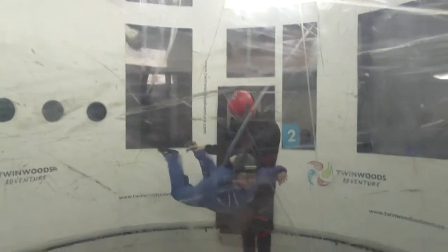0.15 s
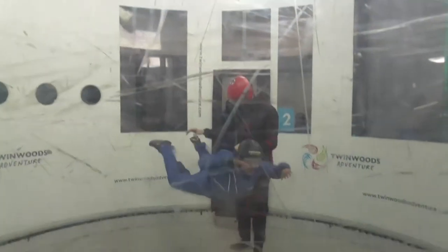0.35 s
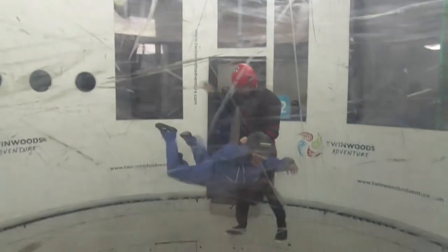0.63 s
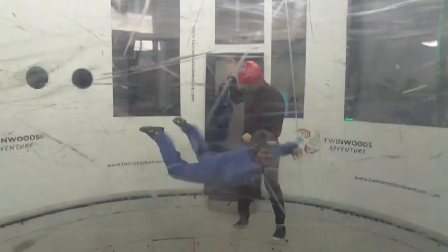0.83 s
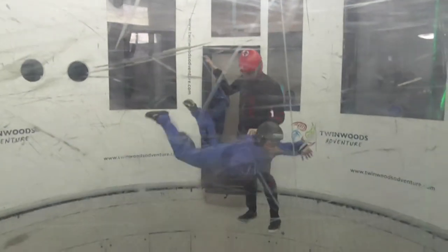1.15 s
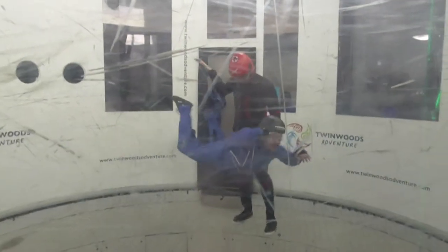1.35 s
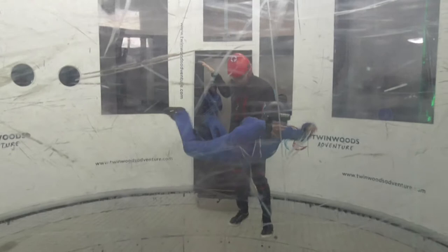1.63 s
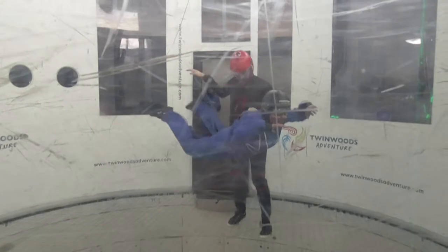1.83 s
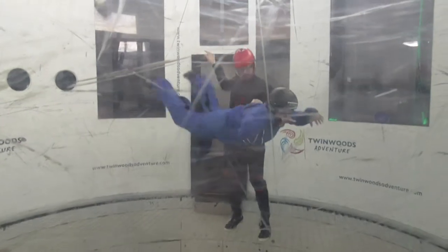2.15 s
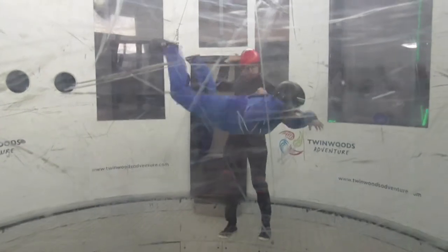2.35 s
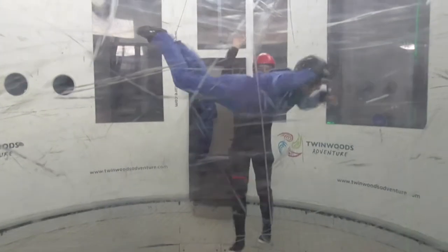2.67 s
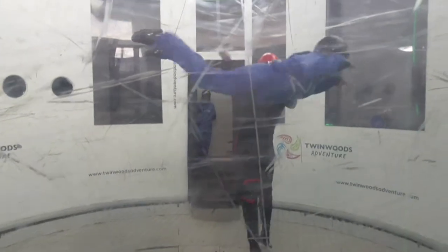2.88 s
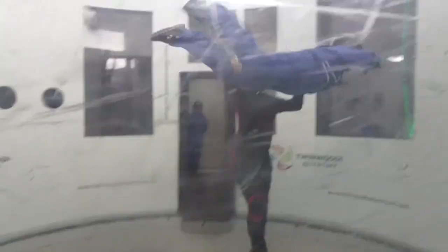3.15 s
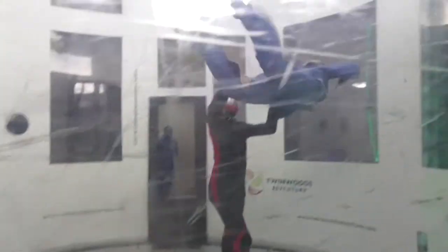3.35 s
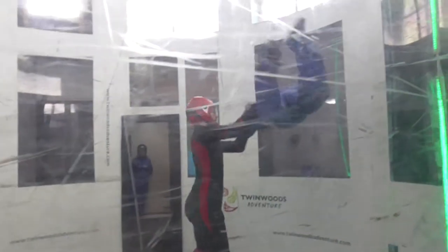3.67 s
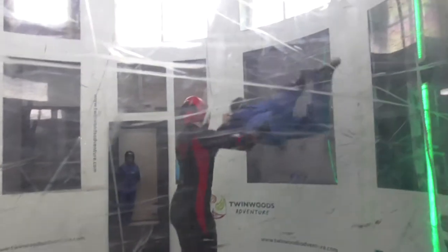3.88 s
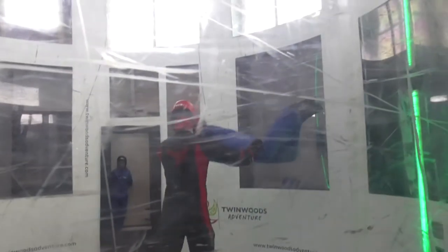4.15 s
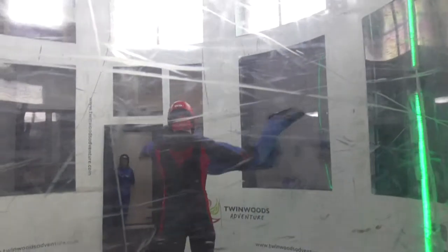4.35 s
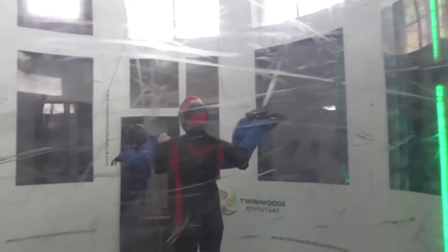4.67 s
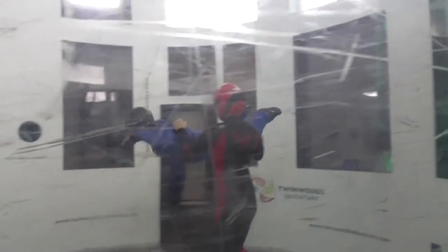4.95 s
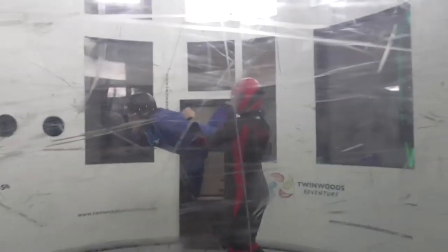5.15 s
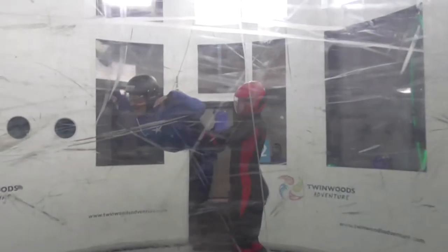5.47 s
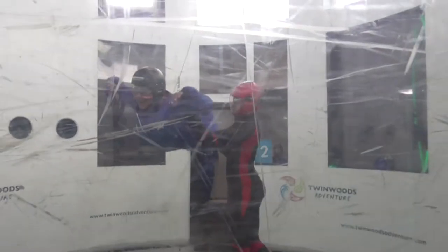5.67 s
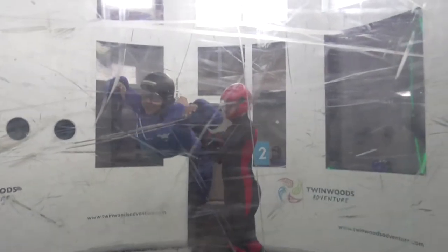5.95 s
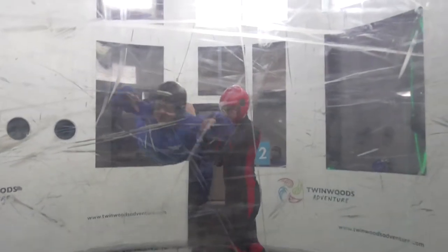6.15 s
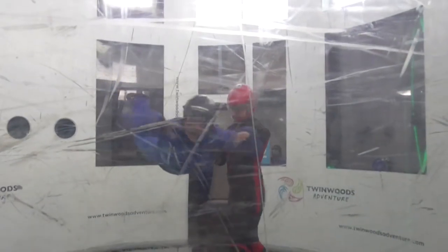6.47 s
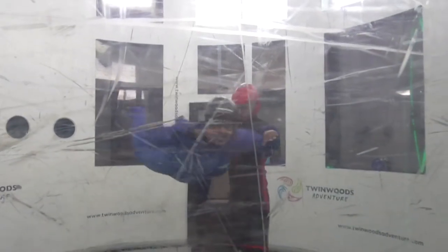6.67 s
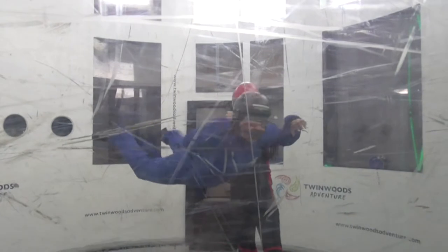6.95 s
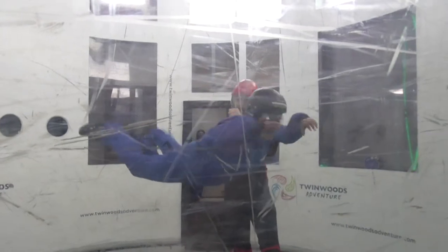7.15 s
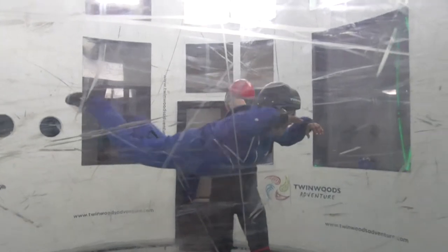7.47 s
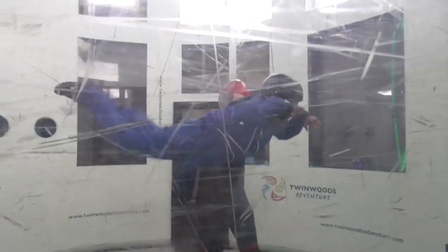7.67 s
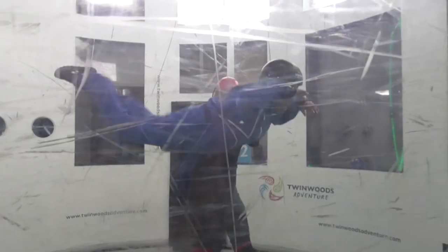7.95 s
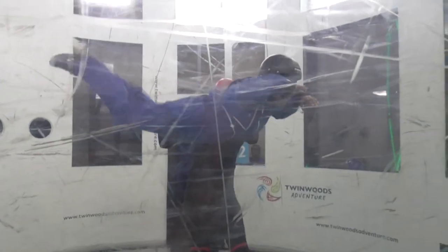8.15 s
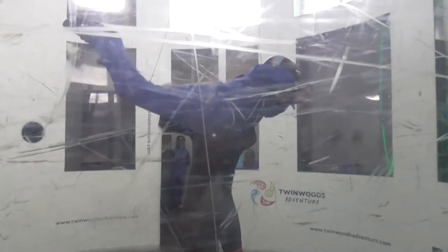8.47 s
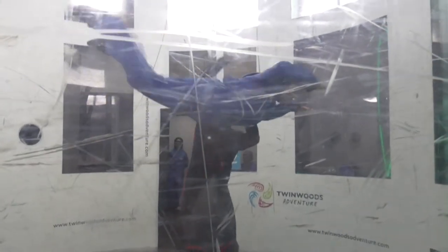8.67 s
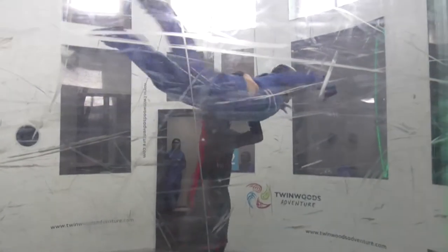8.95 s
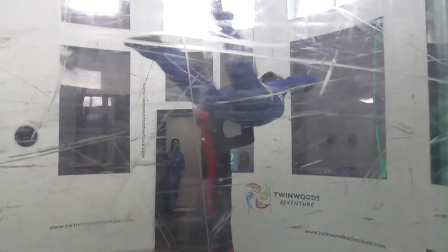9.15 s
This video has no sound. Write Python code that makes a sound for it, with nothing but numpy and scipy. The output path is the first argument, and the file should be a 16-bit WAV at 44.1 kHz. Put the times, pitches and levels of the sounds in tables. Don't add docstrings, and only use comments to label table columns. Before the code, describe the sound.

Loud low-frequency wind tunnel roar, pulsing and booming without pause, with a soft hollow hum, thin air hiss and tiny irregular high ticks.

```python
import sys
import numpy as np
from scipy import signal
from scipy.fft import rfft, irfft, next_fast_len
from scipy.io import wavfile
from scipy.ndimage import uniform_filter1d, minimum_filter1d

SR = 44100
rng = np.random.default_rng(int(sys.argv[2]) if len(sys.argv) > 2 else 0)


def field_ratio(decibels):
    return 10 ** (np.asarray(decibels, dtype=float) / 20)


def log_audio(samples):
    frames = np.atleast_2d(samples).T
    limited = np.clip(frames, -1, 1)
    pcm = np.round(limited * 32767).astype(np.int16)
    wavfile.write(sys.argv[1], SR, pcm)


N = 411012
TIME = np.arange(N) / SR
SIZE = next_fast_len(N)
HZ = np.maximum(np.fft.rfftfreq(SIZE, 1 / SR), 1)
BLADE_HZ = 62.39


# (order [blade rates], halo centre [Hz], halo width [Hz], halo over tone [dB], level [dB rms])
LOW_ORDERS = [
    (1, 55.0, 20, -4, -25),
    (2, 117.9, 23.5, -0.5, -18),
    (3, 186.8, 33, -1, -19.5),
    (4, 251.4, 72, 12.5, -24),
    (5, 311, 21.4, 7, -28),
]
# (time [s], change [dB])
FIRST_BEATS = [(0.93, 4), (1.79, -2.5), (2.08, 4), (2.62, -3), (3.05, -2.5), (3.29, 3), (3.48, -6),
               (3.58, 3), (4.35, 4), (4.85, -4), (6.46, -3.5), (7.51, 4), (7.62, -7), (7.89, -5),
               (8.94, -5), (9.21, -3.5)]
# (time [s], change [dB])
SECOND_BEATS = [(0.03, -7.5), (0.2, -10.5), (0.89, -10), (1.1, 4), (1.26, -6), (2.66, 4), (2.801, -6.5),
                (3.0, 4.5), (3.17, -4.5), (3.46, -7.5), (3.709, 5), (3.83, -9.5), (4.3, -6.5), (4.47, 6.5),
                (4.6, -5), (4.81, 3.5), (5.19, 5), (6.62, -3), (6.919, 4.5), (7.36, -7.5), (7.55, -5.5),
                (7.92, 5.5), (8.17, -4), (8.37, -5), (8.55, 6), (8.73, -12.5), (8.89, -7), (9.17, -9.5)]
# (time [s], change [dB])
THIRD_BEATS = [(0.42, -6.5), (0.57, 4), (0.769, 3.5), (0.87, -6.5), (0.97, 5.5), (1.06, -12.5), (1.15, 2),
               (1.3, -5.5), (1.73, 5.5), (1.97, 3.5), (2.731, 4.5), (3.0, 4), (3.26, 6), (3.87, -7.5),
               (4.19, -5.5), (4.32, -5), (4.52, -5), (4.99, -5), (5.27, -7), (5.92, -4), (6.05, 4),
               (6.49, 3.5), (7.19, 4.5), (7.471, 4), (8.17, 6), (8.34, 4.5), (8.779, -5), (8.92, 5)]
# (time [s], change [dB])
FOURTH_BEATS = [(0.6, 4.5), (0.76, 3), (0.9, 6.5), (1.52, 5), (1.89, -3.5), (2.12, -6), (2.36, 2.5),
                (2.64, -4), (3.06, -2), (4.15, -3), (4.28, -3), (4.52, -4), (4.72, -5.5), (4.89, -5),
                (5.2, -5), (6.24, -4.5), (6.51, 7.5), (7.6, 8), (8.06, -3), (8.23, 3.5)]


def fan():
    all_beats = [FIRST_BEATS, SECOND_BEATS, THIRD_BEATS, FOURTH_BEATS, FOURTH_BEATS]
    beat_s = 0.042
    out = 0
    for (order, hz, width_hz, halo_db, level_db), beats in zip(LOW_ORDERS, all_beats):
        halo = field_ratio(halo_db) * field(hump(hz, width_hz) ** 2)
        even_share = 0.72 if order < 5 else 0.1
        throb = evened(tone(order) + halo, even_share)
        out = out + field_ratio(level_db + bumps(beats, beat_s)) * throb
    return out


# (order [blade rates], level [dB rms])
TONES = [
    (6, -39),
    (7, -52),
    (8, -42.5),
    (9, -43),
    (11, -47),
    (12, -49),
    (13, -53),
    (17, -59),
]


def whine():
    return sum(field_ratio(level_db) * tone(order) for order, level_db in TONES)


# (time [s], rise [dB])
SWELLS = [(1.71, 3.5), (2.29, 9), (2.52, 4.5), (3.43, 12), (4.12, 7.5), (4.34, 8), (4.71, 5.5), (5.8, 6.5),
          (5.99, 9), (6.31, 6.5), (6.69, 6), (7.22, 7), (7.6, 6.5), (7.84, 6), (8.03, 9.5), (9.3, 11)]


def chamber():
    centre_hz, width_hz, level_db = 494.8, 21, -39
    swell_s = 0.074
    ring = evened(field(hump(centre_hz, width_hz) ** 2), 0.6)
    return field_ratio(level_db + bumps(SWELLS, swell_s)) * ring


# (time [s], peak level [dB])
KNOCKS = [(0.0154, -50), (0.0962, -46), (0.2084, -48), (0.5601, -45), (0.6724, -48), (1.1523, -52),
          (1.297, -46), (2.274, -48), (2.4044, -48.5), (2.5162, -45), (2.7087, -49), (2.9163, -47.5),
          (3.1248, -49), (3.9275, -52), (4.7611, -50), (5.0, -46), (5.0654, -49.5), (5.3537, -50),
          (5.5623, -54), (5.9289, -52), (6.121, -50), (6.6029, -47), (7.3257, -52), (7.5328, -45.5),
          (7.9189, -52), (8.094, -50), (8.3025, -47), (8.7979, -52), (9.0394, -48), (9.1032, -47)]
# (time [s], chance [0-1])
LOOSENESS = [(0, .5), (.22, .45), (.3, .05), (.5, .8), (1.45, .75), (2.1, .25), (2.5, .45), (3.35, .25),
             (3.5, .08), (4.55, .03), (4.7, .35), (5.2, .12), (6.6, .15), (6.8, .02), (7.1, .02),
             (7.3, .45), (8.1, .1), (9.1, .65)]


def ticks_due():
    light_db, spread_db, knock_lift_db = -52.5, 2.5, 4.5
    phase, jitter = 0.96, 0.03
    turn = np.arange(int(N / SR * BLADE_HZ) - 2)
    luck = rng.random(len(turn))
    late, size = rng.standard_normal((2, len(turn)))
    tick_s = np.abs(turn + phase + jitter * late) / BLADE_HZ
    tick_db = light_db + spread_db * np.clip(size, -2, 2)
    knock_s, knock_db = np.transpose(KNOCKS)
    shaken = luck < columns(LOOSENESS, tick_s)[0]
    nearest_knock_s = np.min(np.abs(tick_s[:, None] - knock_s), axis=1)
    keep = shaken & (nearest_knock_s > 0.5 / BLADE_HZ)
    return np.r_[knock_s, tick_s[keep]], np.r_[knock_db + knock_lift_db, tick_db[keep]]


# (frequency [Hz], level [dB], time to fall 60 dB [s])
FITTING = [
    (10100, 0.5, .007),
    (10730, 3, 0.0091),
    (11400, -2.5, 0.006),
]


def fitting():
    bounce_s, bounce_db = 0.004, -13
    pan_db, lag = -3, 1
    strike_s, peak_db = ticks_due()
    at = ((strike_s + 0.0004) * SR).astype(int)
    chance = rng.standard_normal((len(at), 5))
    out = 0
    for k, (hz, level_db, t60) in enumerate(FITTING):
        at = at + 24
        clicks = np.zeros(N) + 1e-18
        clicks[at] = field_ratio(peak_db - 3.0 + level_db + 3.0 * chance[:, k])
        clicks[at + round(bounce_s * SR)] = clicks[at] * field_ratio(bounce_db + 3.0 * chance[:, 3])
        decay = field_ratio(-60 / (t60 * SR))
        angle = 2 * np.pi * hz / SR
        ring = signal.lfilter([0, np.sin(angle)], [1, -2 * decay * np.cos(angle), decay * decay], clicks)
        out = out + ring * (-1) ** k
    housing = signal.butter(3, [9500, 12000], "band", fs=SR, output="sos")
    out = signal.sosfilt(housing, out)
    return np.array([np.roll(out, lag) * field_ratio(pan_db / 2), out / field_ratio(pan_db / 2)])


# (time [s], level [dB rms])
SCUFF = [
    (.30, -86),
    (.35, -59.5),
    (.40, -62),
    (.47, -80),
]


def scuff():
    hiss = field(hump(8250, 500.0) + 0.7 * hump(9500, 1500.0))
    return field_ratio(columns(SCUFF, TIME)[0]) * hiss


# (frequency [Hz], level [dB per Hz])
RUMBLE = [(15, -40), (25, -27), (43, -14.5), (80, -9), (114, 0), (154, -5.5), (190, -5.5), (307, -7),
          (421, -11), (579, -11.5), (854, -20), (1350, -28), (1700, -38.5), (2210, -78.5), (3740, -120)]
# (frequency [Hz], width [Hz], level [dB rms])
DUCT = [
    (150, 13.0, -28.5),
    (208, 22.0, -30.0),
    (372, 30.0, -37.0),
    (436, 20.0, -41.0),
    (582, 26.0, -41.0),
    (665, 22.0, -45.0),
    (770, 40.0, -48.0),
]
# (frequency [Hz], level [dB per Hz])
RUSH = [(1200, -38), (1700, -9.5), (2100, -7.5), (2890, -17), (3400, -11), (3950, 1.1), (4600, -9.5),
        (5200, -11), (6000, -23.5), (7800, -20), (8700, -24), (10300, -25.5), (12200, -33.5), (15700, -47)]


def air():
    rumble_db, rush_db = -22, -45.5
    rumble = rms_one(field_ratio(columns(RUMBLE, HZ, np.log)[0]))
    rush = rms_one(field_ratio(columns(RUSH, HZ, np.log)[0]))
    power = field_ratio(2 * rumble_db) * rumble ** 2 + field_ratio(2 * rush_db) * rush ** 2
    for hz, width_hz, level_db in DUCT:
        power = power + field_ratio(2 * level_db) * rms_one(hump(hz, width_hz)) ** 2
    return np.sqrt(np.mean(power)) * field(np.sqrt(power))


# (time [s], level [dB])
GAIN_DRIFT = [(0.05, -48), (1.05, -45), (1.18, -48), (1.92, -46), (2.18, -49), (2.2, -47.5), (3.61, -45.5),
              (3.79, -48), (3.82, -46.5), (4.87, -47.5), (4.9, -46), (5.1, -48.5), (5.41, -47.5),
              (8.56, -45.5), (8.67, -48.5), (8.87, -45.5), (9.21, -46.5), (9.26, -46)]


def gain_drift_db():
    drift_db = columns(GAIN_DRIFT, TIME)[0]
    return drift_db - np.mean(drift_db)


def ducking_db(bass):
    share, settle_s = 0.34, 0.08
    r = np.exp(-1 / (settle_s * SR))
    power = np.mean(bass ** 2, axis=0) / np.mean(bass ** 2)
    recent = signal.lfilter([1 - r], [1, -r], power, zi=[r])[0]
    return -share * 10 * np.log10(recent)


# (frequency [Hz], left-right likeness [-1 to 1], left lead [radians], left over right [dB])
PORTS = [(60, .998, -.07, -.5), (95, .994, -.1, -.5), (130, .972, -.18, .4), (250, .93, .15, .4),
         (500, .86, .1, .2), (1000, .55, .3, .4), (2000, .45, .2, .1), (4000, .42, .3, .5),
         (6200, .44, .3, .6), (7400, -.45, -.7, .1), (8800, -.45, -.7, .1), (10500, .1, .5, -1.1),
         (13000, .28, .01, -3.2)]


def ports(hz):
    return columns(PORTS, hz, np.log)


def tone(order):
    _, lead, pan_db = ports(order * BLADE_HZ)
    side = np.array([[0.5], [-0.5]])
    lag = 1.0 * order ** 2
    phase = 2 * np.pi * order * BLADE_HZ * TIME - lag + side * lead
    return np.sqrt(2) * field_ratio(side * pan_db) * np.cos(phase)


def field(shape):
    alike, lead, pan_db = ports(HZ)
    alike = np.clip(alike, -0.999, 0.999)
    mid, side = rfft(rng.standard_normal((2, SIZE)))
    mid = np.sqrt(1 + alike) * mid
    side = np.sqrt(1 - alike) * side
    tilt = field_ratio(pan_db / 2) * np.exp(0.5j * lead)
    spectrum = shape * np.array([(mid + side) * tilt, (mid - side) / tilt])
    return rms_one(irfft(spectrum, SIZE)[:, :N])


def hump(hz, width_hz):
    return 1 / (1 + (2 * (HZ - hz) / width_hz) ** 2)


def evened(x, share):
    power = uniform_filter1d(uniform_filter1d(np.mean(x ** 2, axis=0), size=3500), size=3500)
    return rms_one(x / (power / np.mean(power) + 0.052) ** (share / 2))


def bumps(rows, half_s):
    coarse = TIME[::100]
    total = sum(change_db * np.exp(-0.5 * ((coarse - s) / half_s) ** 2) for s, change_db in rows)
    return np.interp(TIME, coarse, total)


def rms_one(x):
    return x / np.sqrt(np.mean(x ** 2) + 1e-20)


def columns(rows, at, warp=np.asarray):
    first, *rest = np.transpose(rows)
    return [np.interp(warp(at), warp(first), column) for column in rest]


def scene():
    bass = fan()
    gain = field_ratio(gain_drift_db() + ducking_db(bass))
    return bass + chamber() + gain * (whine() + fitting() + scuff() + air())


def roll_off(x):
    return signal.sosfilt(signal.butter(12, 15720, fs=SR, output="sos"), x)


def record(dry):
    low_cut = signal.butter(1, 26, "high", fs=SR, output="sos")
    cut = signal.sosfilt(low_cut, dry)
    peak = np.max(np.abs(cut), axis=0) + 1e-9
    hold = minimum_filter1d(np.minimum(1, 0.8 / peak), size=800)
    limiter_gain = uniform_filter1d(uniform_filter1d(hold, size=400), size=400)
    return roll_off(cut * limiter_gain)


dry = scene()
out = record(dry)
log_audio(out)
```